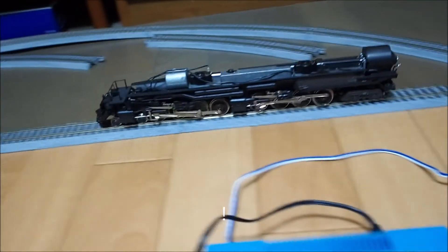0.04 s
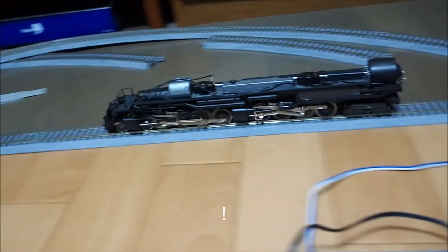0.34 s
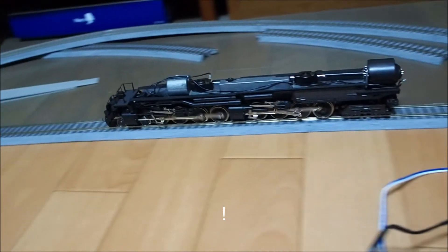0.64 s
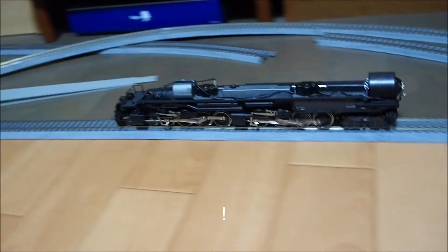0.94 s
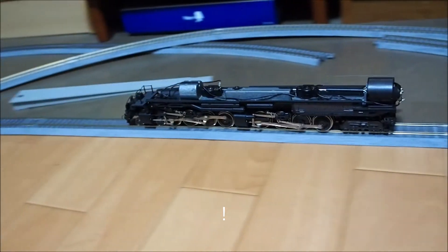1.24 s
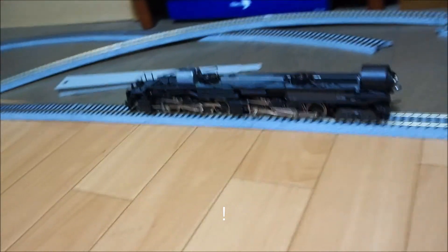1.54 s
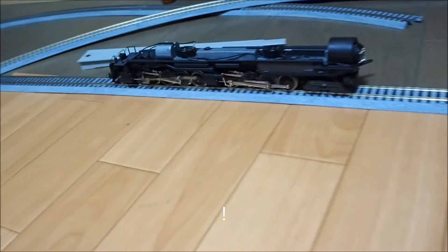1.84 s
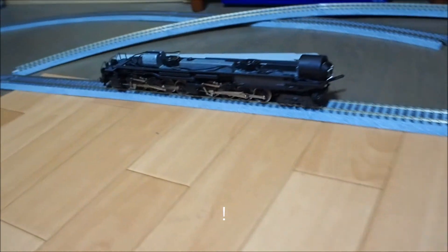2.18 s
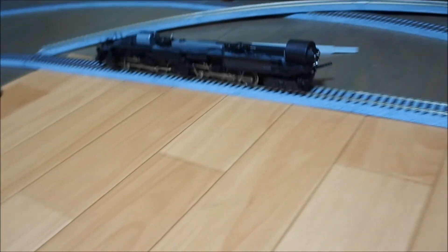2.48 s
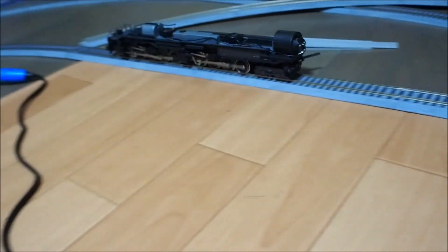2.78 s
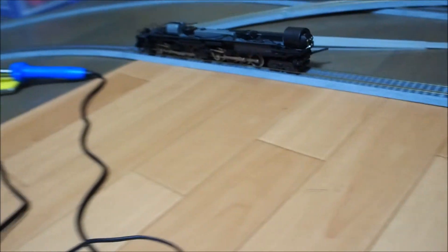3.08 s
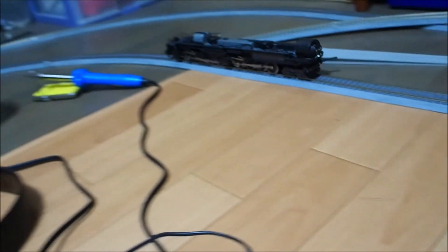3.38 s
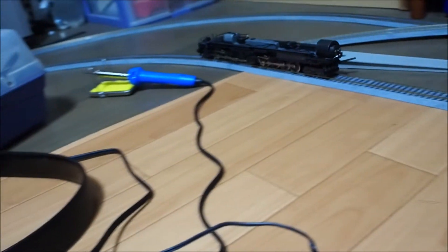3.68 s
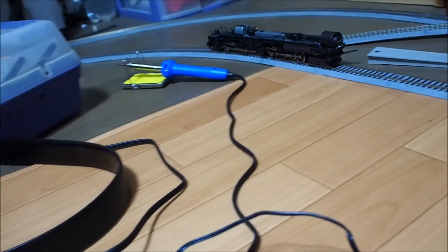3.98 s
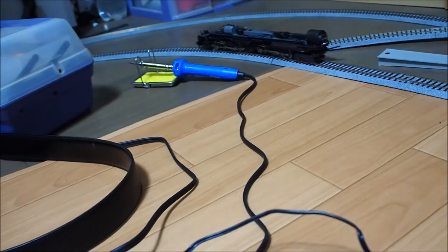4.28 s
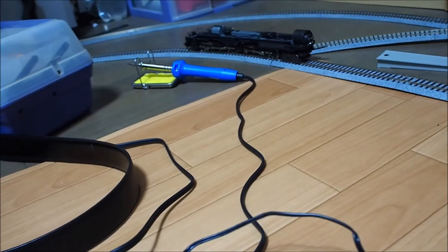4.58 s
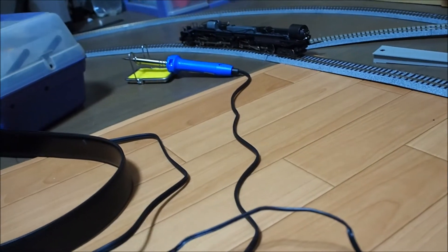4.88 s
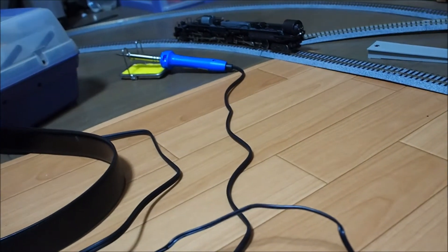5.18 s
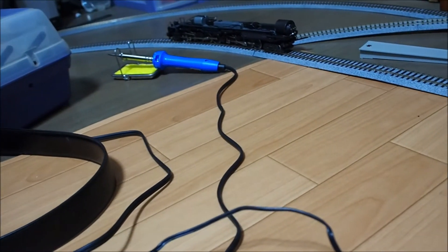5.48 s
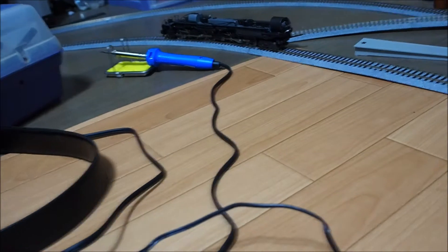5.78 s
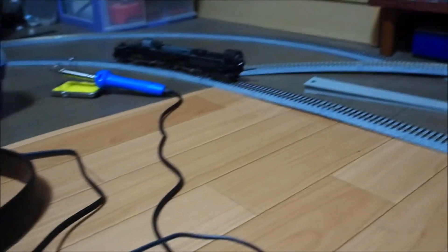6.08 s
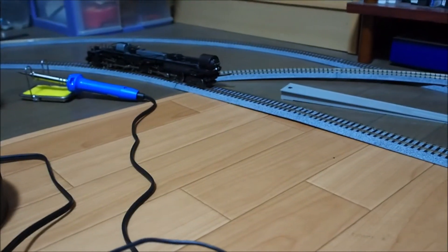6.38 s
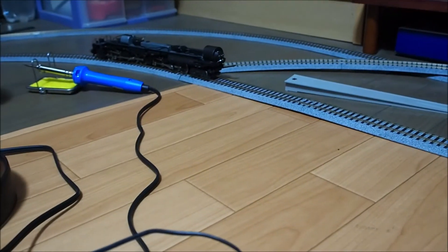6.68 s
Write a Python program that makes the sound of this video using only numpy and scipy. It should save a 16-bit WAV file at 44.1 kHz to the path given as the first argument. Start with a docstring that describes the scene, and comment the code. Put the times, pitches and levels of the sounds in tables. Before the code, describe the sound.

A small model train runs with a rattling gear whir, stops with a brief squeak, and a few close plastic snaps follow.

```python
"""A model steam locomotive runs away from a stereo microphone, on plastic track on a wooden floor.
Its gears whir, its drive knocks on every turn of the motor shaft, its wheels rumble, scrape and
jolt over rail joints. It stalls at a turnout with a short stick-slip squeak and stands, faintly whining.
Then something plastic is handled close to the microphone, on the right: brushing, and snaps that ring
its case. The place is a small, quiet, furnished room."""
import sys
import numpy as np
from scipy import signal
from scipy.fft import rfft, irfft, next_fast_len
from scipy.io import wavfile
from scipy.ndimage import uniform_filter1d

SR = 44100
rng = np.random.default_rng(int(sys.argv[2]) if len(sys.argv) > 2 else 0)


def master(y):
    """Save y as 16-bit WAV."""
    cut = np.clip(np.atleast_2d(y).T, -1, 1)
    pcm = np.round(cut * 32767)  # scale
    wavfile.write(sys.argv[1], SR, pcm.astype(np.int16))


N = 296793
TIME = np.arange(N) / SR
STALL_S = 4.304  # the drive starts to run down at the turnout
# spectrum of fine contacts, at gear teeth and wheel flanges: f/Hz, level/dB
GRIT_SPECTRUM = [(500, -23), (950, -8.5), (1400, -4.5), (1620, -3.5), (1850, 0), (2300, 0.5), (2700, 1),
                 (3100, 3), (4000, -2.5), (5500, -4), (8000, -9), (15000, -13.5)]


def locomotive():
    """Drive, gears and wheels sound through the shell, slightly right of centre, until the stall."""
    # resonances of shell and chassis: f/Hz, width/Hz, gain/dB
    shell = [(1409, 63, 5.5), (2020, 80, 2.5), (3020, 150, 0), (5986, 93, 5), (7300, 140, -1.5)]
    run_down_db_per_s, stand_s, stop_fade_s = 34, 4.48, .087
    running = from_db(-run_down_db_per_s * since(STALL_S))
    running *= np.clip(1 - since(stand_s) / stop_fade_s, 0, 1)
    knocks = drive_knocks()
    works = knocking_metal(knocks) * pan(2.7) + gear_whir(knocks) * pan(2.2) + wheel_rumble() * pan(.55)
    return running * loose_rods(track_ring(peaks(works, shell)))


def drive_knocks(slack_s=2.06):
    """Envelope: the drive knocks once a turn; gone slack past a rail joint, on the half turn as well."""
    # motor shaft: t/s, speed/(turns per s)
    shaft = [(0.0, 52.78), (0.86, 52.48), (1.24, 50.75), (1.31, 52.2), (1.71, 48.52), (1.78, 46.2),
             (2.14, 46.52), (2.19, 48.45), (2.98, 46.92), (3.13, 49.41), (3.43, 48.1), (3.77, 44.51)]
    speed = in_time(shaft)
    turns = np.cumsum(speed) / SR - .055
    full = knock_train(turns, speed, decay_s=.0026, uneven_db=.9, jitter=.006)
    half = knock_train(turns - .51, speed, decay_s=.003, uneven_db=1.2, jitter=.01)
    knocks = np.where(TIME < slack_s, full, from_db(-3) * full + from_db(-1) * half)
    return uniform_filter1d(knocks, size=32)  # a contact takes under a millisecond to build


def knock_train(turns, speed, decay_s, uneven_db, jitter):
    """One sharp, quickly dying knock per turn, each a little different."""
    turns = turns + jitter * drift(37)
    strength = from_db(uneven_db * rng.standard_normal(400))
    age_s = (turns % 1) / speed
    return strength[np.floor(turns).astype(int) + 2] * np.exp(-age_s / decay_s)


def knocking_metal(knocks, sizzle_s=2.3, settle_s=.78, dies_db_per_s=19):
    """Each knock rattles the metal of the drive; at the stall this dies first."""
    # force of the knock: t/s, relative level/dB
    force = [(0.0, -41), (0.81, -40), (0.93, -42), (2.04, -41.5), (2.17, -39.5), (2.45, -39), (3.41, -43),
             (3.68, -45), (4.13, -46), (4.3, -51)]
    # spectrum of the metal: f/Hz, level/dB
    spectrum = [(1000, -26.5), (2500, -8.5), (4200, -1), (5300, 3), (6100, 3), (7500, 1), (9200, -1.5),
                (11000, -6.5), (13500, -7.5), (16000, -9.5)]
    chatter = np.hypot(knocks, .2)  # loose rods keep chattering between knocks
    chatter /= np.sqrt(uniform_filter1d(chatter ** 2, SR // 8))
    metal = stereo_colour(grains(per_s=36000, spread_db=.1) * chatter, spectrum)
    # the rail joint sets the valve gear sizzling, which settles again
    sizzle_db = 1.5 * (TIME > sizzle_s) * np.exp(-since(sizzle_s) / settle_s)
    metal = peaks(metal, [(13300, 2300, sizzle_db)])
    return from_db(in_time(force) + 3 - dies_db_per_s * since(STALL_S)) * metal


def gear_whir(knocks):
    """Tiny tooth contacts merge into a whir that follows the load and lifts a little at each knock."""
    # load on the teeth: t/s, relative level/dB
    load = [(0.0, -40.5), (0.38, -39.5), (1.1, -44), (1.46, -41.5), (1.68, -45.5), (3.45, -42.5),
            (3.6, -44.5), (4.17, -45), (4.3, -45.5)]
    teeth = stereo_colour(grains(per_s=12000, spread_db=1.4) * (1 + .12 * knocks), GRIT_SPECTRUM)
    return from_db(in_time(load) + 3 + 1.18 * drift(25.03)) * teeth


def wheel_rumble(near_db=-49.5, far_db=-55):
    """Rolling wheels rumble unevenly, quieter on the far length of track."""
    # spectrum of the rolling: f/Hz, level/dB
    spectrum = [(30, -50), (70, -28), (120, -14.5), (160, -12), (220, -7), (340, -17.5), (480, -13),
                (650, 1.5), (830, -2.5), (1100, -4), (1600, -10), (3000, -18.5)]
    rolling = stereo_colour(grains(per_s=3000, spread_db=0), spectrum)
    return from_db(near_db + (far_db - near_db) * far_share() + 1.7 * drift(24.02)) * rolling


def track_ring(sound):
    """Each length of track rings as far as the locomotive is on it."""
    # resonances of the near and the far length: f/Hz, width/Hz, gain/dB
    near_modes = [(1200, 40, 3.5), (1420, 280, 5), (2250, 230, 2), (5390, 320, 4)]
    far_modes = [(1060, 210, 4), (1640, 210, -0.5), (2030, 50, 3.5), (2700, 420, 3), (7530, 370, 4.5),
                 (8950, 1050, 4)]
    far = far_share()
    return (1 - far) * peaks(sound, near_modes) + far * peaks(sound, far_modes)


def far_share(middle_s=1.73, crossing_s=.4):
    """How much of the locomotive has rolled onto the far length of track, 0-1."""
    return np.clip(.5 + (TIME - middle_s) / crossing_s, 0, 1)


def loose_rods(sound, flutter_db=3.3):
    """Loose rods and valve gear ring on and off."""
    # their notes: f/Hz
    notes = [1830, 2273, 2630, 3024, 3300, 4400, 5150, 5870, 7460, 8720]
    return peaks(sound, [(hz, hz / 28, flutter_db * drift(21.985) - .8) for hz in notes])


def flange_scrapes(edge_s=.025):
    """Fine grit under a flange, in one broad resonance, for as long as it bears on the rail."""
    # flange contacts: t/s, length/s, level/dB, f/Hz, width/Hz
    contacts = [(.3, 0.23, -44.5, 2210, 900), (0.801, .21, -38, 2350, 1700),
                (1.153, 0.197, -43.5, 1900, 2200), (3.333, .14, -45, 3600, 900)]
    grit, out = stereo_colour(grains(per_s=6000, spread_db=2), GRIT_SPECTRUM), 0
    for s, length, db, hz, width in contacts:
        contact = np.clip(np.minimum(TIME - s, s + length - TIME) / edge_s, 0, 1)
        out = out + from_db(db) * contact * rms_one(resonate(grit, hz, width))
    return out * pan(2.1)


def track_noises():
    """Wheels jolt over joints and turnout; the floor thuds, and once the track bed hums on."""
    # bright jolts: t/s, level/dB, f/Hz, width/Hz, decay/s
    jolts = [(.673, -24.5, 2000, 3000, 0.0017), (1.762, -29, 6150, 4030, .014),
             (1.880, -30, 2490, 1200, 0.0046), (2.031, -24, 7900, 8600, .003),
             (3.320, -23.5, 3440, 3000, 0.006), (3.457, -23.5, 2560, 4440, 0.0036),
             (4.292, -35, 4170, 3500, .005), (4.302, -22.5, 3600, 6000, 0.0025),
             (4.309, -31.5, 5440, 7000, 0.011), (4.408, -42.5, 4100, 900, 0.0088),
             (5.022, -51, 3360, 1190, 0.018)]
    # dull floor thuds and one low, lingering hum of the track bed: same columns
    thuds_and_hum = [(1.16, -54, 448, 110, 0.38), (1.19, -42, 700, 400, 0.0086),
                     (1.65, -41.5, 650, 400, 0.022), (2.458, -35, 630, 397, 0.0038),
                     (2.481, -39, 620, 400, 0.0057), (2.508, -33, 645, 350, 0.0028),
                     (4.617, -49, 800, 600, .01), (4.645, -50.5, 590, 600, 0.026),
                     (4.756, -54, 600, 494, 0.014), (4.943, -45.5, 699, 605, 0.0055),
                     (5.024, -49.5, 600, 450, .015), (5.28, -51.5, 696, 700, 0.029)]
    return ring_down(jolts, apart=.58) * pan(2.2) + ring_down(thuds_and_hum, apart=.092) * pan(1.2)


def ring_down(rows, apart):
    """Each row is noise dying away in one resonance; apart is the stereo width."""
    out, t = np.zeros((2, N)), TIME[:SR // 2]
    for s, db, hz, width, decay in rows:
        mid, side = rng.standard_normal((2, len(t)))
        fade = np.exp(-t / decay)
        noise = (mid + apart * side * [[1], [-1]]) * fade
        ring = resonate(resonate(noise, hz, width), hz, 2 * width)
        add(out, s, from_db(db) * rms_one(ring) * np.sqrt(np.mean(fade ** 2)))
    return out


def wheel_squeak(start_s=4.47, hold_s=.017, pitch_hz=897, mode_hz=990):
    """Stick and slip give a chirp that beats against a nearby wheel mode and thins as it rings out."""
    # overtones: multiple of the pitch, relative level/dB
    partials = [(2, -7.5), (3, -17), (4, -15), (5, -6), (6, -24)]
    attack_s, release_s, ring_s = .00058, .002, .024
    t, after = since(start_s), since(start_s + hold_s)
    release = np.maximum(np.exp(-after / release_s), from_db(-14) * np.exp(-after / ring_s))
    level = from_db(-30) * -np.expm1(-t / attack_s) * release
    lag = np.array([[.5], [0]])  # it reaches the right port first
    rough_hz = pitch_hz * (1 + .012 * drift(600))
    phase = 2 * np.pi * np.cumsum((t > 0) * rough_hz) / SR - lag
    wheel_mode = -from_db(-2) * np.cos(2 * np.pi * mode_hz * t - lag)
    overtones = sum(from_db(db) * np.sin(k * phase) for k, db in partials)
    sharpness = from_db(-2.5 + 230 * np.minimum(t, .04))
    return level * pan(3.1) * (np.sin(phase) + wheel_mode + sharpness * overtones)


def plastic_clicks(crack_s=.00096, attack_s=.00021):
    """Close on the right, each snap rings the case and two notes of its own; quieter ones are duller."""
    # snaps: t/s, level/dB, ring f/Hz, its t60/s, second f/Hz, its level/dB, body/dB, right lead/dB
    snaps = [(5.803, -26.5, 8500, 0.0044, 7400, -9, -27, 15), (5.814, -29, 5430, 0.0031, 9000, -6, -29, 8),
             (5.836, -33, 8400, 0.0059, 3500, -5, -16, 18),
             (5.928, -38.5, 7000, 0.0032, 4000, -8, -1.5, 20),
             (6.192, -13, 8670, 0.0049, 11200, -3.5, -28, 15),
             (6.240, -37, 2750, 0.013, 1470, -5, -3.5, 15.5),
             (6.3446, -11.5, 6000, 0.0048, 4050, -10, -21.5, 12),
             (6.519, -23, 5680, 0.0062, 8750, 2, -4.5, 16),
             (6.5546, -21, 8340, 0.0065, 2900, -15, -7.5, 13)]
    # modes of the plastic case: f/Hz, level/dB, t60/s
    case = [(567, -9.5, 0.011), (990, -11, 0.018), (1520, -8.5, 0.018), (2070, -11, 0.0035),
            (2880, -11, 0.0066), (3950, -15, 0.0046), (6050, -9, 0.0058), (6900, -33, 0.053),
            (7840, 2, 0.0029), (10200, 3.5, 0.0015), (11200, -3, 0.00099), (14100, -13, 0.0017)]
    # the camera body shades the left port, the treble most: f/Hz, width/Hz, gain/dB
    shade = [(3800, 3500, 1.5), (13500, 5000, -2)]
    out, t = np.zeros((2, N)), TIME[:SR // 12]
    loudest_db = max(row[1] for row in snaps)
    for s, db, ring_hz, ring_t60, second_hz, second_db, body_db, lead_db in snaps:
        treble_db = .1 * (db - loudest_db)
        notes = np.sin(2 * np.pi * ring_hz * t) + from_db(second_db) * np.cos(2 * np.pi * second_hz * t)
        crack = np.diff(rng.standard_normal((2, len(t) + 1))) * np.exp(-t / crack_s)
        snap = notes * from_db(-60 * t / ring_t60) + from_db(treble_db - 5) * crack
        for k, (hz, mode_db, t60) in enumerate(case):
            uneven_db = 1.5 * rng.standard_normal((2, 1))
            tilt_db = np.interp(hz, [1800, 3830, 8500, 11500], [body_db, 0, 0, treble_db])
            fade = from_db(mode_db + tilt_db + uneven_db - 60 * t / t60)
            snap += (-1) ** k * np.sin(2 * np.pi * hz * t) * fade
        add(out, s, from_db(db) * pan(lead_db) * snap * -np.expm1(-t / attack_s))
    return np.array([peaks(out[0], shade), out[1]])


def plastic_brushes():
    """Brief bright friction on the plastic, close on the right."""
    # strokes: t/s, level/dB, half length/s
    strokes = [(4.955, -60.5, 0.096), (5.57, -60.5, 0.032), (5.815, -44.5, 0.0087), (5.838, -48, .004),
               (6.11, -62, 0.064), (6.7, -58.5, .004)]
    spectrum = [(1500, -13), (4000, -5.5), (8000, -4.5), (16000, -16)]  # f/Hz, level/dB
    return swells(strokes) * pan(13.4) * stereo_colour(grains(per_s=9000, spread_db=1), spectrum)


def standing_whines():
    """Faint, thin, wavering whines of the standing locomotive swell and fade."""
    # whines: t/s, f/Hz, level/dB, half length/s
    whines = [(4.8, 5950, -69, .09), (5.5, 2767, -61.5, 0.23), (5.99, 2760, -63, 0.13)]
    waver, flicker = 1 + .004 * drift(60), from_db(2.2 * drift(18))
    return flicker * sum(np.sin(2 * np.pi * np.cumsum(hz * waver) / SR) * swells([(s, db, length)])
                         for s, hz, db, length in whines)


def room_echo(x, t60, wall_hz):
    """A diffuse tail, dulled by the walls."""
    t = TIME[:SR // 2]
    tail = rng.standard_normal((2, len(t))) * from_db(-60 * t / t60) * (t > .003)
    tail = signal.lfilter(*signal.butter(1, wall_hz, fs=SR), tail)
    tail /= np.sqrt(np.sum(tail ** 2) / 2)
    return signal.fftconvolve(x.mean(0)[None], tail, axes=1)[:, :N]


def room_tone():
    """Quiet room noise, with a soft swell of handling near 6 s."""
    # spectrum of the noise: f/Hz, level/dB
    spectrum = [(25, -6), (45, -25.5), (80, -11.5), (110, -7), (230, -7), (330, -9), (430, -5), (540, 0.5),
                (740, -9.5), (960, -6), (1500, -10), (3000, -12.5), (5300, -17.5), (15000, -25)]
    # room and handling noise together: t/s, relative level/dB
    levels = [(4.6, -54), (5.38, -56.5), (5.97, -53), (6.31, -57), (6.73, -55.5)]
    gain = from_db(in_time(levels) + .5 + .48 * drift(17))
    return gain * stereo_colour(rng.standard_normal((2, N)), spectrum)


def from_db(db):
    """Decibels to gain."""
    return 10 ** (np.asarray(db) / 20)


def rms_one(x):
    """Scale to unit power."""
    return x / np.sqrt(np.mean(x ** 2) + 1e-20)


def since(s):
    """Seconds gone by since a moment; zero before it."""
    return np.maximum(TIME - s, 0)


def in_time(rows):
    """Read a curve at every sample."""
    return np.interp(TIME, *np.transpose(rows))


def at_hz(points, hz):
    """Read a spectrum on a log-frequency axis."""
    f, value = np.transpose(points)
    return np.interp(np.log(hz + 1), np.log(f), value)


def pan(db):
    """Channel gains for a level lead of the right side."""
    return from_db(np.array([[-db], [db]]) / 2)


def drift(rate):
    """A random wander of rms 1, with rate new values a second."""
    knots = rng.standard_normal(int(N / SR * rate) + 2)
    return rms_one(np.interp(TIME * rate, np.arange(len(knots)), knots))


def swells(rows):
    """Gain of bell-shaped swells."""
    return sum(from_db(db) * np.exp(-((TIME - s) / length) ** 2) for s, db, length in rows)


def grains(per_s, spread_db):
    """Two streams of tiny random contacts of uneven size."""
    sizes = from_db(spread_db * np.minimum(rng.exponential(1, N), 4))
    return rms_one(rng.standard_normal((2, N)) * sizes * (rng.random(N) < per_s / SR))


def stereo_colour(excitation, spectrum):
    """Two unrelated excitations become left and right with this spectrum; rms 1."""
    # likeness of left and right at the microphone: f/Hz, correlation
    likeness = [(100, .55), (300, 0.61), (700, 0.81), (1400, 0.74), (2800, 0.34), (5600, 0.32),
                (9000, 0.15), (15000, 0.033)]
    size = next_fast_len(N + 4096)
    hz = np.arange(size // 2 + 1) * SR / size
    alike = at_hz(likeness, hz)
    mid, side = rfft(excitation, size) * from_db(at_hz(spectrum, hz))
    left_right = np.sqrt(1 + alike) * mid + np.sqrt(1 - alike) * side * [[1], [-1]]
    return rms_one(irfft(left_right, size)[:, :N])


def resonate(x, hz, width_hz):
    """One resonance with gain 1 on top."""
    return signal.lfilter(*signal.iirpeak(hz, hz / min(width_hz, SR / 3), fs=SR), x + 1e-18)


def peaks(x, modes):
    """Lift or cut narrow bands in turn."""
    for hz, width, db in modes:
        x = x + (from_db(db) - 1) * resonate(x, hz, width)
    return x


def add(out, s, sound):
    """Mix a short sound in at a time."""
    start = round(s * SR)
    out[:, start:start + sound.shape[1]] += sound[:, :N - start]


def scene():
    """The locomotive on the floor and the handling close by, in a small furnished room."""
    track = track_noises()
    hand = plastic_clicks() + plastic_brushes()
    squeak = wheel_squeak()
    echoes = from_db(-7.5) * room_echo(squeak + track, t60=.058, wall_hz=5960)
    echoes += from_db(-19.5) * room_echo(hand, t60=.1, wall_hz=7000)
    railway = locomotive() + flange_scrapes() + track + squeak
    return railway + hand + echoes + room_tone() + standing_whines()


def record(dry):
    """The microphone ports notch the treble; the top is cut."""
    # colour of the ports: f/Hz, width/Hz, gain/dB
    ports = [(1598, 144, -3.5), (1850, 120, 2.5), (6530, 990, -8.5), (10400, 1950, -9.5)]
    cutoff_hz = 15750
    return signal.sosfilt(signal.ellip(10, .1, 80, cutoff_hz, fs=SR, output="sos"), peaks(dry, ports))


dry = scene()
out = record(dry)
master(out)
```